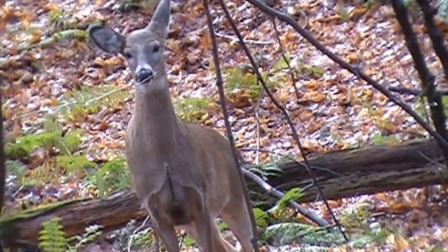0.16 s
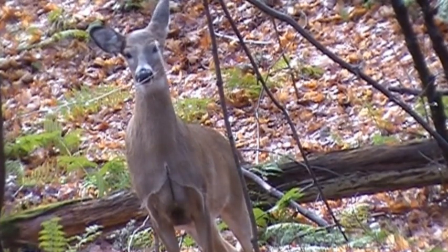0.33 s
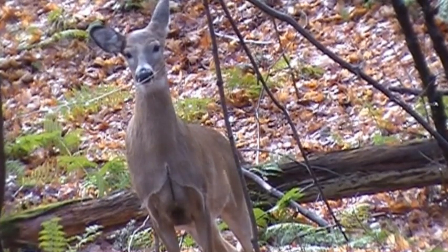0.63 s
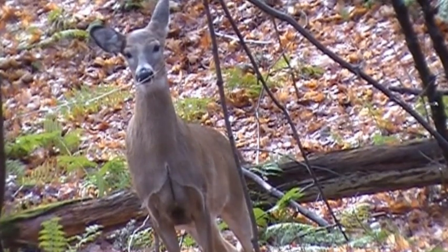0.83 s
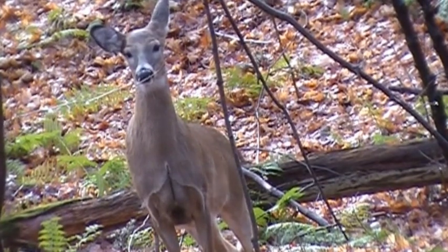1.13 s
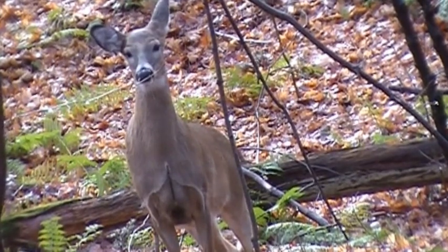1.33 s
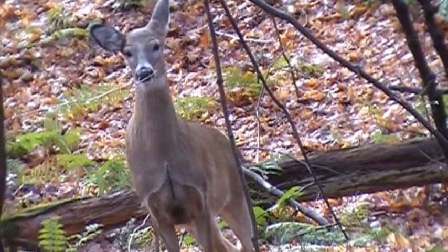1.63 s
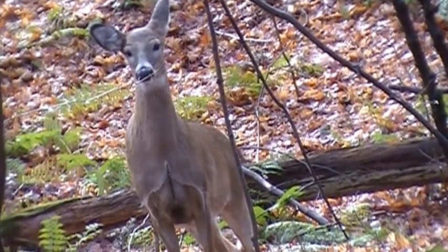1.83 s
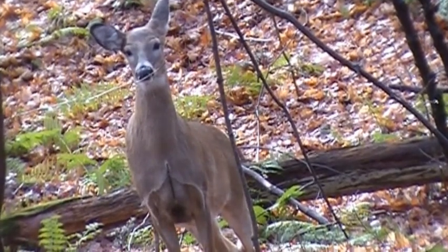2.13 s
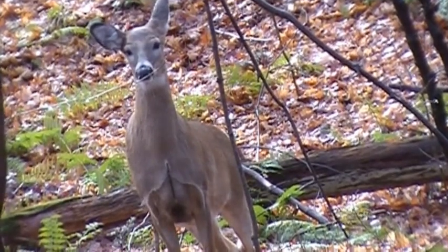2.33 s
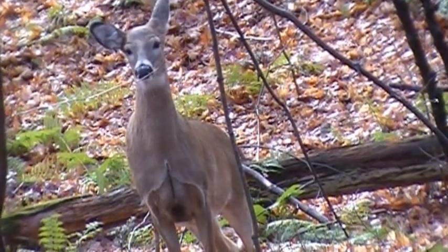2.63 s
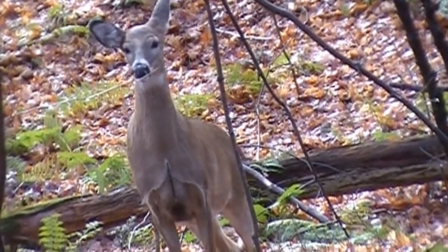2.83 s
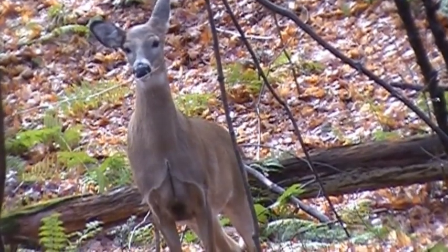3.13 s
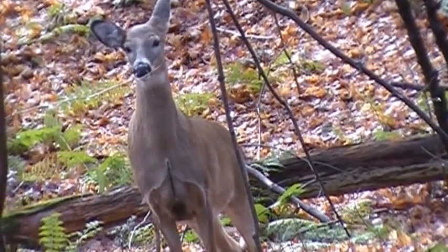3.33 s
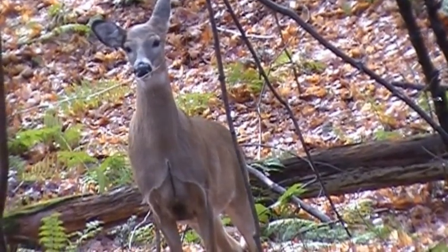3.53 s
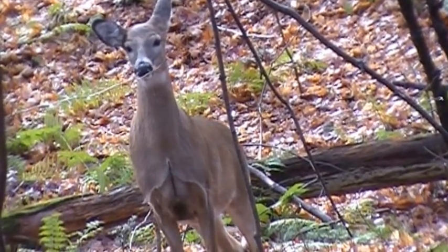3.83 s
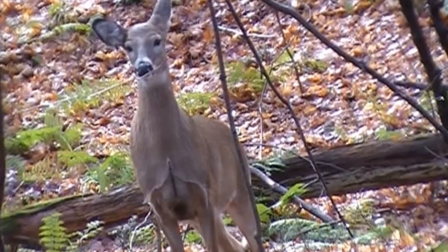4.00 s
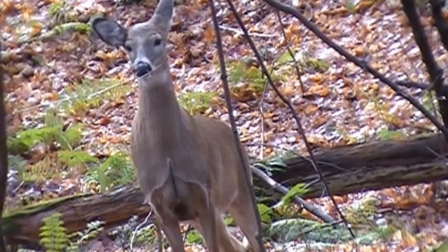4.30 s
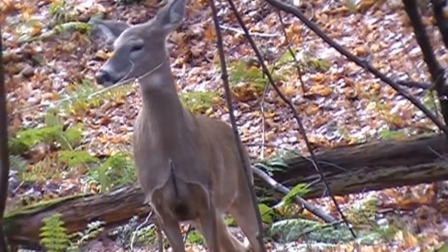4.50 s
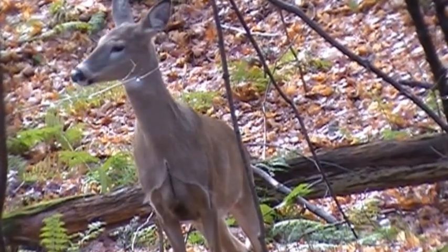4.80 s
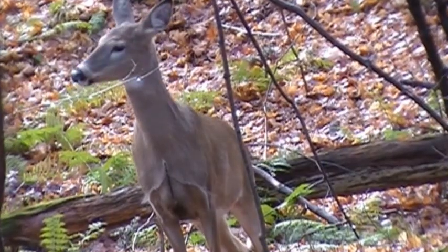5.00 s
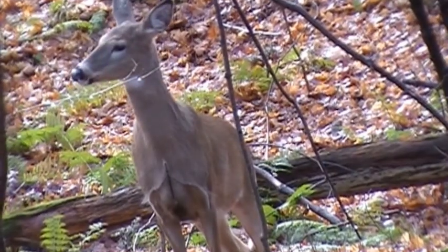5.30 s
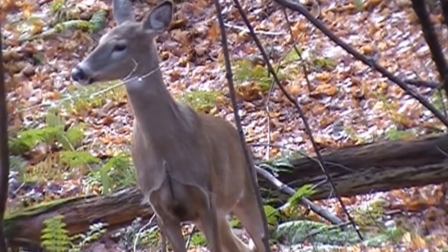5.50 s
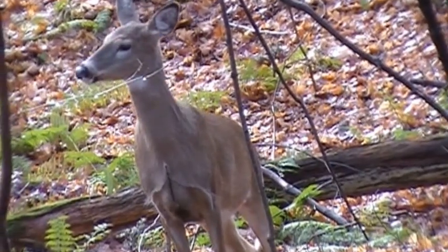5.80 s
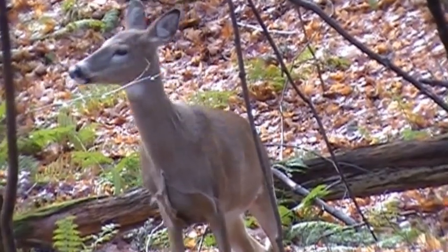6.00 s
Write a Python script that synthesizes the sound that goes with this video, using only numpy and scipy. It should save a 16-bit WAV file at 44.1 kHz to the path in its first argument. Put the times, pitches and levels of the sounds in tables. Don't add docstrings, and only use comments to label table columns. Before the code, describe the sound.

In an autumn wood, from 0 to about 2 seconds, light raindrops fall thickly on dry leaves: short irregular ticks, brittle snaps and duller taps, over fine patter and a soft, airy hush. In the first 0.8 second, small birds twitter behind foliage, blurred, with a distant flock strongest at the very start. A lull in chirps follows until about 1.5 seconds, when quick high whistles return, each rising sharply and sliding down. After 2 seconds the drops become scattered, with a small cluster near 2.8 and another around 4. Birds grow clearer and nearer, lively around 3 to 3.5 and continuing to the end at about 6, with short trunk echoes. Extremely faint higher notes come from a tiny far bird near 4.7 to 4.9. Barely noticeable low gusts touch the stereo camera microphone from 4.6 to 5.5.

```python
import sys
import numpy as np
from scipy import signal
from scipy.fft import rfft, irfft
from scipy.io import wavfile
from scipy.ndimage import uniform_filter1d

SR = 44100
rng = np.random.default_rng(int(sys.argv[2]) if len(sys.argv) > 2 else 0)


def amplitude_ratio(level_db):
    exponent = np.asarray(level_db, float) / 20
    return 10 ** exponent


def digitize_waveform(pressure):
    field = np.atleast_2d(pressure).T
    bounded = np.clip(field, -1, 1)
    quanta = np.round(bounded * 32767).astype(np.int16)
    wavfile.write(sys.argv[1], SR, quanta)


N = 271215

# t/s, litter thud/dB, leaf/dB
LIMP_DROPS = [(.0981, -63, -60), (.1306, -43, -46.5), (.3244, -45.5, -46.5), (.3346, -54, -45),
              (.436, -41.5, -48), (.7726, -45.5, -43), (.8122, -41.5, -50), (1.0282, -50, -46),
              (1.4427, -59, -54), (1.584, -46.5, -58), (1.6727, -47.5, -54), (1.7829, -42.5, -50),
              (1.8633, -63, -46.5), (1.9213, -46, -46), (2.1548, -45.5, -50), (2.7351, -47, -50),
              (2.7517, -60, -51), (2.7783, -46, -50), (2.8273, -50, -51), (3.0281, -48.5, -58),
              (3.1793, -45, -64), (3.6046, -48, -55), (3.946, -49, -66), (4.2578, -51, -52),
              (4.398, -50, -58), (4.447, -63, -53), (5.1243, -59, -49), (5.2253, -51, -53),
              (5.5434, -46.5, -64), (5.7526, -49.5, -56)]
# t/s, litter thud/dB, leaf/dB
DRY_DROPS = [(.0716, -44, -50), (.1083, -40, -44.5), (.237, -66, -48), (.3774, -46, -50),
             (.4121, -55, -44.5), (.427, -52, -44), (.4446, -36.5, -53), (.47, -51, -43),
             (.5689, -40, -43.5), (.679, -55, -51), (.712, -39.5, -45.5), (.8263, -47, -46),
             (.9995, -44, -49.5), (1.1448, -47, -52.5), (1.2068, -46, -52), (1.3629, -44.5, -52),
             (1.4478, -60, -47), (1.5653, -50, -51), (1.6522, -67, -49), (1.707, -49, -49),
             (1.8144, -63, -49), (1.8934, -45.5, -45.5), (1.902, -66, -50), (2.5013, -52, -48.5),
             (2.9553, -49, -47), (3.29, -51, -48), (4.0295, -41.5, -43), (4.054, -48, -47.5),
             (4.1493, -46, -48.5), (5.9711, -65, -44.5)]
# t/s, litter thud/dB, leaf/dB
STRAY_DROPS = [(.2952, -54, -53), (1.189, -54, -54), (1.5334, -56, -53), (1.9853, -62, -53),
               (2.141, -59, -51.5), (2.203, -60, -52), (2.258, -62, -53), (3.006, -55, -53),
               (3.055, -60, -54), (3.74, -58, -54), (4.691, -50, -69), (4.7477, -58, -54),
               (5.4397, -60, -52), (5.887, -64, -58)]
# t/s, litter thud/dB, leaf/dB
BRITTLE_DROPS = [(.0254, -70, -48), (.22, -49, -46), (.3098, -56, -49), (.452, -43.5, -40),
                 (.4592, -50, -43), (.5197, -63, -47), (.6117, -58, -47), (.6415, -64, -53),
                 (.6597, -42.5, -44.5), (.7273, -46, -43), (.7516, -58, -38.5), (.7976, -50, -45),
                 (.853, -43, -36), (.886, -43.5, -43), (.9732, -44, -43), (1.0493, -56, -42.5),
                 (1.2601, -49, -46), (1.425, -61, -57), (1.4871, -51, -48), (1.763, -57, -44.5),
                 (2.391, -51, -45), (2.55, -68, -44), (2.7308, -61, -48), (2.7657, -56, -44.5),
                 (2.8635, -55, -42.5), (3.8862, -59, -49), (4.0464, -63, -56), (5.1184, -61, -50),
                 (5.42, -70, -56), (5.486, -53, -45)]


def near_drops():
    kinds = [  # drops, body dB, snap dB
        (LIMP_DROPS, 1, -6),
        (DRY_DROPS + STRAY_DROPS, 2, -2),
        (BRITTLE_DROPS, -8.5, -4.5),
    ]
    rows = []
    for table, body_db, snap_db in kinds:
        for s, thud_db, leaf_db in table:
            rows.append((s, thud_db, leaf_db + body_db, leaf_db + snap_db))
    rows = np.array(rows)
    direct = amplitude_ratio(7.5) * drops(rows[:, 0], rows[:, 1:], ring_ms=1.0, lag_spread=1.35)
    litter = trunks(direct.mean(0), t60_s=0.19, start_s=0.0012)
    return direct + amplitude_ratio(-4.5) * litter


# thud/dB, body/dB, snap/dB
PATTER_PARTS_DB = [-3.5, 2, -6]


def patter(spread_db, colour_db):
    count = 4200
    s = rng.random(count) * (N - 1) / SR
    size = np.minimum(rng.exponential(1, (count, 1)), 3.6)
    parts_db = spread_db * size + colour_db * rng.standard_normal((count, 3)) + PATTER_PARTS_DB
    direct = drops(s, parts_db, ring_ms=0.99, lag_spread=2.6)
    litter = trunks(direct.mean(0), t60_s=0.13, start_s=0.00049)
    return amplitude_ratio(8.0) * far_level(2) * evened(direct + amplitude_ratio(-0.5) * litter)


# f/Hz, level/dB
LEAF_COLOUR = [(500, -1), (1000, 3), (2100, 2), (3300, -0.5), (5000, 2.5), (6600, 4), (8500, -1.5),
               (11000, -14), (15500, -32)]
# f/Hz, level/dB
LEFT_DB = [(60, 2), (240, 0.5), (950, 0.5), (3770, -0.5), (6000, -9), (8300, 3), (11000, -0.5), (15000, -4)]
# f/Hz, phase/rad
LEFT_LEAD_RAD = [(100, 0.025), (5000, 0.032), (7000, 1.2), (8300, 1.64), (9300, 1.1), (15000, .05)]


def drops(s, parts_db, ring_ms, lag_spread):
    count, size = len(s), 256
    hz, ms = np.fft.rfftfreq(size, 1 / SR), np.arange(size) * 1000 / SR
    chance = rng.random((count, 5, 1))
    noise = rng.standard_normal((count, size))

    thud = np.interp(hz, [2200, 3000], [1, 0])
    snap = np.interp(hz, [5300, 6200], [0, 1])
    body = 1 - thud - snap
    parts = amplitude_ratio(parts_db) @ np.array([thud * 1.61, body * 1.61, snap * 1.53])
    colour = parts * amplitude_ratio(read(LEAF_COLOUR, hz))
    rattle = irfft(rfft(noise) * colour, size)

    decay_ms = ring_ms * (0.68 + 1.35 * chance[:, 0])
    rebound_ms = 0.8 + 0.81 * chance[:, 1]
    rebound = 0.42 * np.exp(-((ms - rebound_ms) / 0.25) ** 2)
    attack = np.clip(ms / 0.41, 0, 1)
    burst = rfft(rattle * attack * (np.exp(-ms / decay_ms) + rebound))

    lumps = uniform_filter1d(abs(burst) ** 2, size=7) / uniform_filter1d(colour ** 2, size=7)
    burst = burst / (lumps + 1e-12) ** 0.23
    burst = burst * hz ** 2 / (hz ** 2 + 900 ** 2)
    wanted = np.sum(colour ** 2, 1, keepdims=True)
    burst = burst * 6.53 * np.sqrt(wanted / np.sum(abs(burst) ** 2, 1, keepdims=True))

    lag = lag_spread * (chance[:, 2] - 0.5)
    turn = np.exp(0.5j * (read(LEFT_LEAD_RAD, hz) + 2 * np.pi * hz / SR * lag))
    lean = amplitude_ratio(1.5 * (chance[:, 3] - 0.14) + 0.23 * read(LEFT_DB, hz))
    out = np.zeros((2, N + size))
    at = np.round(s * SR).astype(int)[:, None] + np.arange(size)
    for port, way in zip(out, (turn * lean, 1 / turn / lean)):
        port += np.bincount(at.ravel(), irfft(burst * way, size).ravel(), N + size)
    return out[:, :N]


# top t/s, level/dB, top f/Hz, fall/octaves, fall swell/dB
HIGH_CHIRPS = [(.108, -53, 4970, 0.96, -3), (1.5404, -51, 5670, 0.9, -3), (1.7404, -58, 5520, 0.6, -3),
               (1.7807, -48.5, 5720, 0.98, -3), (1.8637, -51.5, 5230, 0.68, -9),
               (2.2924, -51.5, 5470, 0.257, -7), (2.7288, -54.5, 5400, 0.89, -3),
               (2.994, -46.5, 5210, 0.44, -5), (3.0503, -46, 5580, 0.92, 3),
               (3.2454, -52.5, 4960, 0.47, -4), (3.3009, -47.5, 5480, 0.67, -5),
               (3.5085, -49, 5050, 0.6, -7), (3.7672, -48, 5090, 0.45, -7), (3.9075, -53, 5240, 0.37, -3),
               (4.644, -50.5, 5620, .78, 7), (4.8455, -53.5, 5540, 0.85, -4),
               (5.258, -52.5, 5070, 0.75, -7), (5.377, -59, 5150, 0.36, -3), (5.47, -55, 5380, 0.84, 0),
               (5.9246, -54, 5290, 0.7, -2), (6.138, -56, 5300, 0.4, 7)]
# top t/s, level/dB, top f/Hz, fall/octaves, fall swell/dB
LOW_CHIRPS = [(1.5948, -51, 4840, 0.24, -7), (1.811, -53, 4860, 0.4, -7), (2.002, -53, 4910, 0.45, -7),
              (2.043, -59, 5040, .51, -5), (2.482, -51, 4670, 0.49, -8), (2.98, -55, 4710, 0.42, 0),
              (3.061, -53, 4900, 0.3, 3), (3.2163, -50.5, 4920, 0.81, -7), (3.35, -58, 4530, 0.37, -3),
              (3.587, -60, 4450, 0.17, 0), (3.702, -56.5, 4640, .35, -2), (3.856, -60, 4450, 0.19, 0),
              (4.2653, -54.5, 4550, 0.62, -1), (4.414, -63, 4900, 0.6, 5), (4.44, -63, 5200, 0.78, 4),
              (4.59, -62, 4500, .7, 2), (5.478, -51.5, 4890, 0.606, -7), (5.622, -60, 4960, 0.68, 4),
              (5.633, -52, 5050, 0.71, 2), (5.78, -55, 4940, 0.68, 1), (5.8597, -54.5, 4980, 0.72, 3),
              (6.0243, -57.5, 4810, 0.41, 0), (6.0856, -51.5, 4920, 0.72, 0)]
# top t/s, level/dB, top f/Hz, fall/octaves, fall swell/dB
BRISK_CHIRPS = [
    (2.22, -50.5, 5260, 0.6, -11),
    (4.336, -50, 5550, .85, 0),
    (4.8613, -46.5, 5330, 0.75, 3),
    (5.1155, -49.5, 5070, 0.7, 10),
]
# top t/s, level/dB, top f/Hz, fall/octaves, rise/ms
SLOW_CHIRPS = [
    (2.0887, -57.5, 4900, 0.4, 22),
    (2.186, -51, 5270, 0.49, 27),
    (2.21, -60, 4520, 0.41, 29),
    (3.4275, -60, 5200, 0.45, 16),
    (4.5094, -50, 4850, 0.75, 41),
    (4.743, -52.5, 4610, 0.43, 36),
    (5.995, -60, 4450, 0.29, 20),
    (6.126, -58, 5400, 0.63, 15.7),
]
# top t/s, level/dB, top f/Hz, fall/octaves
HIDDEN_CHIRPS = [(.004, -50.5, 4720, 0.345), (0.033, -54, 4430, 0.32), (.226, -53, 4550, 0.47),
                 (.055, -56.5, 4650, .3), (.13, -56, 5000, 0.29), (.165, -58.5, 4990, .3),
                 (.43, -53, 5170, 0.42), (.46, -53, 4990, .57), (0.491, -55, 5600, 0.64),
                 (0.515, -56, 4880, 0.7), (.545, -56, 4700, 0.47), (.58, -57, 4600, 0.43),
                 (.74, -54, 5920, 0.35), (.762, -52, 5680, 0.82), (1.835, -58, 4900, 0.55),
                 (1.891, -56, 5270, 0.4), (1.925, -61, 5320, 0.36), (2.201, -51.5, 5330, 0.47),
                 (2.27, -63, 5020, 0.42), (3.03, -54, 4780, 0.43), (3.08, -54.5, 5100, 0.52),
                 (3.33, -51.5, 4900, 0.7)]
# t/s, scattered share/0-1
VEIL = [
    (0, .45),
    (1.5, 0.3),
    (1.9, 0.4),
    (2.3, 0.3),
    (2.5, 0.14),
    (3.0, 0.24),
    (3.4, .3),
    (3.55, 0.05),
    (4.3, 0.18),
    (6.15, 0),
]


def birds():
    quick_ms, brisk_ms, slow_swell_db = 7.6, 10, 4
    rows = [row + (quick_ms,) for row in HIGH_CHIRPS + LOW_CHIRPS]
    rows += [row + (brisk_ms,) for row in BRISK_CHIRPS]
    rows += [row[:-1] + (slow_swell_db, row[-1]) for row in SLOW_CHIRPS]
    near = calls(rows)
    hidden = calls([row + (0, quick_ms) for row in HIDDEN_CHIRPS])

    flock = np.zeros(N)
    for when, size, top, rise, fall in rng.random((190, 5)):
        _, sound = chirp(9 * size, 4500 + 1300 * top, 7 + 9 * rise, 18 + 18 * fall, 0.8, 0)
        add(flock, when * N / SR, sound)
    far = evened(amplitude_ratio(-9.0) * ports(flock, -0.9, 0.3) + trunks(flock, t60_s=0.64, start_s=0.055))

    veil = np.clip(np.interp(np.arange(N) / SR, *np.transpose(VEIL)), 0, 1)
    direct = ports(np.sqrt(1 - veil) * near + amplitude_ratio(-3.5) * hidden, -0.68, 0.11)
    leaves = trunks(np.sqrt(veil) * near, t60_s=0.045, start_s=0.002)
    leaves = leaves + trunks(amplitude_ratio(-1.5) * hidden, t60_s=0.06, start_s=0.003)
    echo = amplitude_ratio(-7.5) * trunks(near + hidden, t60_s=0.35, start_s=0.033)
    return direct + leaves + echo + amplitude_ratio(-8.0) * far_level(1) * far


def calls(rows):
    out = np.zeros(N)
    for s, db, top_hz, octaves, swell_db, rise_ms in rows:
        fall_ms = 12.99 + 23 * octaves
        lead_s, sound = chirp(db, top_hz, rise_ms, fall_ms, octaves, swell_db)
        add(out, s + lead_s, sound)
    return out


# f/Hz, level/dB
BEAK_COLOUR = [(2600, 12), (3100, -4.5), (3500, -2.5), (4000, 2.5), (4500, 3), (4950, 2.5), (5300, -2),
               (6000, -10)]


def chirp(db, top_hz, rise_ms, fall_ms, fall_octaves, swell_db):
    lead_ms, lead_top_hz, lead_db, fall_bend = 13.0, 4950.0, -2.0, 0.4
    ms = np.arange(-lead_ms - rise_ms, fall_ms, 1000 / SR)
    risen = np.clip(ms / rise_ms + 1, 0, 1)
    fallen = np.clip(ms / fall_ms, 0, 1)

    dip_hz = 2650.0 + 30.0 * rise_ms
    hz = dip_hz + (top_hz - dip_hz) * risen ** (0.7 + rise_ms / 25)
    hz = hz + np.interp(ms, [ms[0], -rise_ms], [lead_top_hz - dip_hz, 0])
    hz = hz * 0.5 ** (fall_octaves * fallen * (1 + fall_bend * (1 - fallen)))
    hz = uniform_filter1d(hz, size=150)

    slow = np.clip((rise_ms - 12) / 10, 0, 1)
    shape_db = np.interp(ms, [-rise_ms - 2, -0.5 * rise_ms, -2, 2],
                         [lead_db - 10 * slow, 4 * slow - 1.5, -3 * slow - 1, 0])
    swell = (np.minimum(1.6 * fallen, 1) - 0.6) * np.exp(-(np.minimum(ms, 0) / 4.0) ** 2)
    fading_db = 1.7 * np.interp(ms, np.linspace(ms[0], ms[-1], 12), rng.standard_normal(12))
    thinning_db = 3.6 * (1 - slow) * np.exp(-((ms + rise_ms) / 3.0) ** 2)
    shape_db = shape_db + swell_db * swell + fading_db - thinning_db

    level = amplitude_ratio(db + read(BEAK_COLOUR, hz) + shape_db)
    tone = np.sqrt(2) * np.sin(2 * np.pi * np.cumsum(hz) / SR)
    return ms[0] / 1000, level * tone * signal.windows.tukey(len(ms), 0.15)


# top t/s, level/dB, top f/Hz
THIN_NOTES = [
    (4.732, -76, 8700),
    (4.915, -76, 8400),
    (4.945, -71, 8450),
]


def thin_bird():
    half_ms, arch = 13, 0.107
    out = np.zeros(N)
    u = np.arange(-half_ms, half_ms, 1000 / SR) / half_ms
    fade = signal.windows.tukey(len(u), 0.5)
    for s, db, top_hz in THIN_NOTES:
        turns = np.cumsum(top_hz * (1 - arch * u ** 2)) / SR
        note = np.sqrt(2) * amplitude_ratio(db) * np.sin(2 * np.pi * turns) * fade
        add(out, s - half_ms / 1000, note)
    return ports(out, 2.5, 0.4)


def trunks(x, t60_s, start_s):
    size = round(t60_s * SR / 20) * 20
    at = np.arange(0, size, 20) + rng.integers(0, 20, (9, size // 20))
    taps = np.zeros((9, size))
    np.put_along_axis(taps, at, rng.choice([-1., 1.], at.shape), 1)
    t, out = np.arange(size) / SR, np.zeros((2, N))
    decay = amplitude_ratio(-60 * t / t60_s) * np.clip(t / start_s, 0, 1)
    for k, (shared, *own) in enumerate(taps.reshape(3, 3, -1)):
        tail = (shared + 0.089 * np.array(own)) * decay
        tail = tail / np.linalg.norm(tail[0])
        turn = np.sqrt(2 / 3) * np.cos(2 * np.pi * (1.7 * np.arange(N) / SR + k / 3))
        out += signal.oaconvolve((x * turn)[None], tail, axes=1)[:, :N]
    return out


# t/s, flock level/dB, fine patter level/dB
FAR_LEVELS = [(0.0, -38, -59.5), (0.29, -52.5, -65.5), (0.68, -51, -59.5), (1.11, -71, -61.5),
              (1.37, -72, -62), (2.02, -45.5, -63.5), (2.23, -52, -63), (2.76, -54, -73), (3.0, -81, -67),
              (3.17, -49.5, -67), (3.6, -55.5, -66), (3.92, -46, -65), (4.16, -58, -69.5),
              (4.57, -50.5, -68), (5.7, -53.5, -68), (6.15, -50, -74)]


def far_level(column):
    rows = np.array(FAR_LEVELS)
    return amplitude_ratio(np.interp(np.arange(N) / SR, rows[:, 0], rows[:, column]))


# t/s, level/dB
GUSTS = [
    (4.65, -69),
    (4.87, -81),
    (5.1, -74),
    (5.5, -72),
]


def wind():
    calm_db, gust_s = -82.5, 0.12
    band = signal.butter(1, [50, 200], "band", fs=SR, output="sos")
    a, b = signal.sosfiltfilt(band, rng.standard_normal((2, N)))
    level = amplitude_ratio(calm_db)
    for s, db in GUSTS:
        level = level + amplitude_ratio(db) * np.exp(-((np.arange(N) / SR - s) / gust_s) ** 2)
    return level * evened(np.array([0.5 * b + 1.14 * a, 0.45 * b - 0.76 * a]))


# f/Hz, density/dB per Hz
HUSH_COLOUR = [(20, -60), (50, -30), (80, -19.5), (125, -2), (200, 0.5), (437, 4.5), (845, 3.5), (1500, 0),
               (2460, -3.5), (4500, -5.5), (7180, -13.5), (11400, -24), (13500, -31), (15500, -54)]
# f/Hz, correlation/-1 to 1
LIKENESS = [(50, -0.13), (100, 1), (200, 0.78), (640, 0.63), (1410, 0.46), (3100, 0.66), (6820, 1),
            (15000, -0.46)]


def hush():
    hush_db, far_rain_db, thinning_db_per_s = -53, 0.53, 0.48
    size, hop = 2048, 512
    frames, hz = N // hop + 5, np.fft.rfftfreq(size, 1 / SR)
    a, b, c, d, patches = rng.standard_normal((frames, 1025, 5)).T
    patches = uniform_filter1d(patches, size=24, axis=0)
    patches = evened(uniform_filter1d(patches, size=7, axis=1))

    same = np.clip(read(LIKENESS, hz), -1, 1)[:, None]
    left = a + 1j * b
    right = same * left + np.sqrt(1 - same ** 2) * (c + 1j * d)
    right = right * np.exp(-1j * read(LEFT_LEAD_RAD, hz))[:, None]
    lean = amplitude_ratio(read(LEFT_DB, hz) / 2)[:, None]

    rain_db = far_rain_db - thinning_db_per_s * np.arange(frames) * hop / SR
    lift_db = np.clip(hz / 700 - 0.3, 0, 1)[:, None] * rain_db
    level = amplitude_ratio(read(HUSH_COLOUR, hz)[:, None] + 0.4 * patches + lift_db)
    z = np.array([left * lean, right / lean]) * level
    return amplitude_ratio(hush_db) * evened(signal.istft(z, nperseg=size, noverlap=size - hop)[1][:, :N])


def evened(x):
    return x / np.sqrt(np.mean(x ** 2) + 1e-20)


def read(points, hz):
    f, value = np.transpose(points)
    return np.interp(np.log(hz + 1), np.log(f + 1), value)


def add(mix, s, sound):
    at = round(s * SR)
    sound = sound[..., max(-at, 0):]
    part = mix[..., max(at, 0):][..., :sound.shape[-1]]
    part += sound[..., :part.shape[-1]]


def ports(x, pan_db, lag):
    turn = np.exp(1j * np.pi * lag * np.fft.rfftfreq(len(x)))
    paths = np.array([turn * amplitude_ratio(pan_db / 2), amplitude_ratio(-pan_db / 2) / turn])
    return irfft(rfft(x) * paths, len(x))


def scene():
    rain = near_drops() + patter(spread_db=4.0, colour_db=2.5)
    return rain + birds() + thin_bird() + wind() + hush()


def roll_off(x):
    return signal.sosfilt(signal.butter(12, 15620, fs=SR, output="sos"), x)


def record(dry):
    limited = signal.sosfilt(signal.butter(8, 14800, fs=SR, output="sos"), dry)
    return roll_off(limited)


dry = scene()
out = record(dry)
digitize_waveform(out)
```